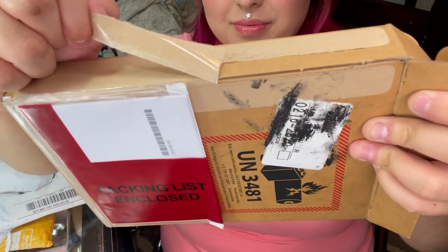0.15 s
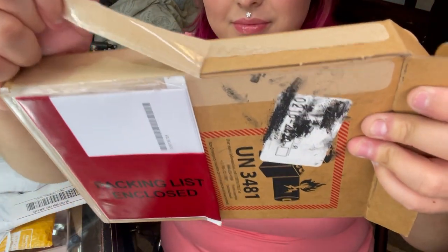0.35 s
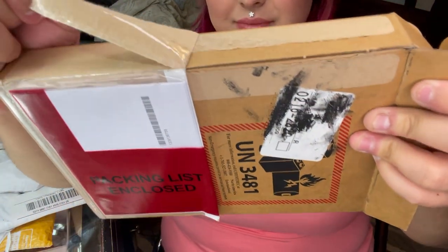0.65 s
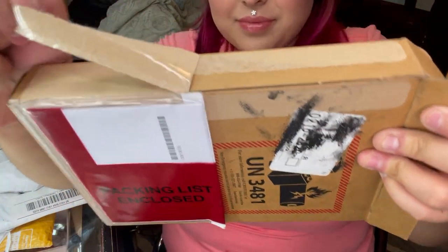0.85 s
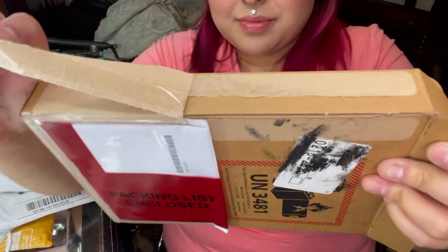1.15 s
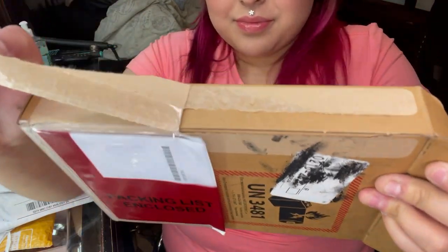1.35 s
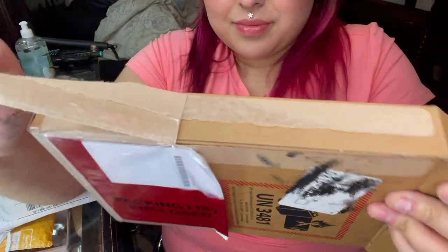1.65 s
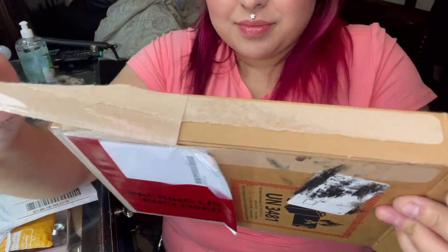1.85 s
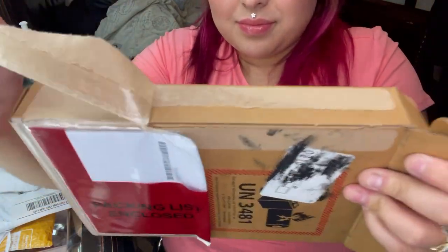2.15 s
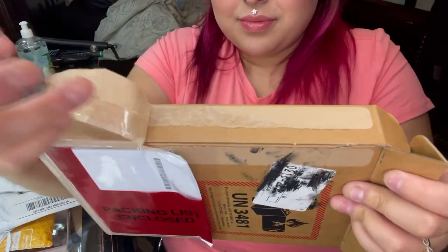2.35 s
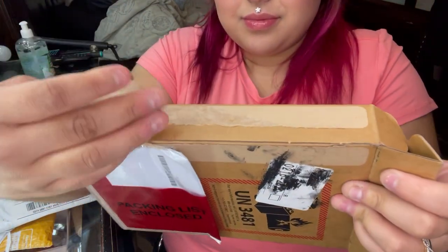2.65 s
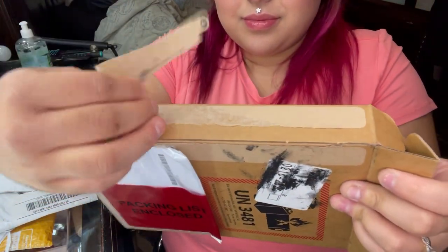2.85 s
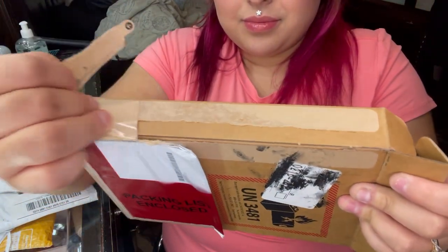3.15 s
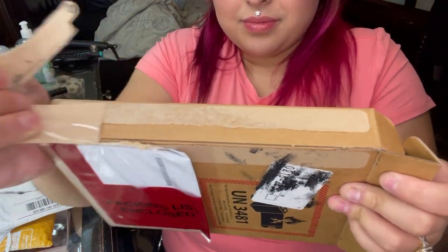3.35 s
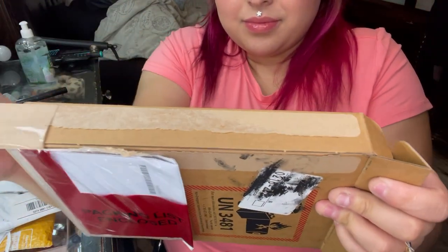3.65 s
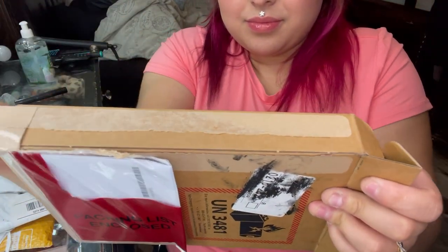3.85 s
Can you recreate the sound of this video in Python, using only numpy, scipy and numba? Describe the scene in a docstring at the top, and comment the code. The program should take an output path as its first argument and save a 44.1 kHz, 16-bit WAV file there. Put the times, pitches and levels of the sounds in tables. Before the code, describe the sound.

Packing tape peels off a cardboard box, close up in a small room. From 0 to 1.9 s a grainy fizz surges and slackens, with a hard tug near 0.87 s, a lull around 1.25 s and a low groan from 1.5 s. Sparse pops follow until 2.8 s. A louder, brighter pull crackles, rings and knocks, ending in a sharp clustered rip at 3.95 s over faint hum.

```python
"""The glue of packing tape fizzes as the strip is pulled off a cardboard box in two goes, close by in a small room.
The fizz is countless tiny random snaps; separate, coarser jerks drum on the box.
The flap groans and is shaken by one hard tug; taut tape rings; creases pop and knock on the box.
At the end the tape tears free in five sharp, overlapping bursts of noise that ring and thump.
Underneath lie a low hum of tones that slowly waver in level and a soft noise of air."""
import sys
import numpy as np
from scipy import signal
from scipy.fft import rfft, irfft, next_fast_len
from scipy.io import wavfile
from scipy.ndimage import uniform_filter1d, map_coordinates
from numba import njit

SR = 44100
rng = np.random.default_rng(int(sys.argv[2]) if len(sys.argv) > 2 else 0)


def master_out(mix):
    """Clip the mix to full scale and print it as 16-bit PCM to the path in sys.argv[1]."""
    frames = np.transpose(np.atleast_2d(mix))
    ceiling = np.clip(frames, -1, 1)
    pcm = np.round(ceiling * 32767).astype(np.int16)
    wavfile.write(sys.argv[1], SR, pcm)


N = 176400


def undb(db):
    """Turn decibels into a gain."""
    return 10 ** (np.asarray(db) / 20)


def unit(x):
    """Scale to an average strength (rms) of 1."""
    return x / np.sqrt(np.mean(x ** 2) + 1e-20)


def clock():
    """Time of each sample in seconds."""
    return np.arange(N) / SR


def curve(table, index=1):
    """One column of a table, joined by straight lines in time."""
    rows = np.array(table, float)
    return np.interp(clock(), rows[:, 0], rows[:, index])


def over_hz(points, size):
    """Points joined on a log-frequency axis, read at the bins of a transform."""
    rows = np.array(points, float)
    bin_hz = np.arange(size // 2 + 1) * SR / size
    return np.interp(np.log(bin_hz + 1), np.log(rows[:, 0]), rows[:, 1])


def colour(x, points):
    """Filter to a given spectrum without sounding early, keeping the power of white noise."""
    size = 4096
    cepstrum = irfft(np.log(unit(undb(over_hz(points, size)))))
    # folding the second half onto the first puts the filter's energy as early as possible
    cepstrum[1:size // 2] *= 2
    cepstrum[size // 2 + 1:] = 0
    response = irfft(np.exp(rfft(cepstrum)))
    return signal.fftconvolve(x, response)[:len(x)]


@njit
def resonate(x, hz, width):
    """Let through a band whose centre may move, as a resonance does."""
    y, band, low = np.empty(len(x)), 0., 0.
    for i in range(len(x)):
        g = np.tan(np.pi * hz[i] / SR)
        damping = width / hz[i]
        v = (band + g * (x[i] + 1e-18 - low)) / (1 + g * (g + damping))
        band = 2 * v - band
        low = low + 2 * g * v
        y[i] = damping * v
    return y


def ringing(x, hz, width):
    """Two equal resonances in a row make a steeper one, brought to rms 1."""
    once = resonate(x, hz, 1. * width)
    return unit(resonate(once, hz, 1. * width))


def walk(rate):
    """Smooth random wander with rms 1, through the given number of random points per second."""
    knots = rng.standard_normal(8192)
    return unit(map_coordinates(knots, [clock() * rate], order=3, mode="wrap"))


def snaps(rate, spread_db, judder_db):
    """Dense tiny snaps of uneven size, bunched as the tape sticks and slips."""
    judder_points_per_s = 148.4
    size = undb(spread_db * np.minimum(rng.exponential(size=N), 5))
    hit = rng.random(N) < rate / SR
    sign = np.sign(rng.standard_normal(N))
    return unit(hit * size * sign * undb(judder_db * walk(judder_points_per_s)))


def patchy(x):
    """The colour shifts between patches of glue: each band swells and fades alone."""
    depth_db, patches_per_s = 0.47, 22
    octave = np.log2(np.arange(N // 2 + 1) * SR / N + 1)
    spectrum, out = rfft(x), 0
    centres = np.arange(7, 14.1, .5)  # half-octave steps, as powers of two in Hz
    for weights in np.eye(len(centres)):
        band = irfft(spectrum * np.interp(octave, centres, weights), N)
        out = out + band * undb(depth_db * walk(patches_per_s))
    return unit(out) * np.std(x)


def ports(x, lag_ms):
    """Direct sound at two microphone ports: a positive lag delays the left, a negative one the right."""
    lag = int(round(lag_ms * SR / 1000))
    return np.array([np.pad(x, (max(late, 0), 0))[:len(x)] for late in (lag, -lag)])


def microphone(x, lag_s):
    """Direct sound reaches the left port late; the swaying box, body and walls scatter the rest."""
    # Each row: frequency in Hz, share of the sound's power that arrives by reflection (0 to 1).
    scatter = [(150, 0.057), (500, 0.33), (1200, 0.66), (5000, 0.9), (7300, 0.35), (8500, 0.0034),
               (10300, 0.017), (12000, 0.071), (15000, 0.031)]
    early_t60_s, room_t60_s, room_db = 0.017, 0.17, -7.5  # time to fade by 60 dB; room against early
    balance_db, sway_per_s = -1, 16  # left against right; random points per second
    size, t = next_fast_len(N + SR // 2), np.arange(SR // 3) / SR
    share = np.clip(over_hz(scatter, size), 0, 1)
    hz, spectrum, out = np.arange(size // 2 + 1) * SR / size, rfft(x, size), []
    for lag, side in ((lag_s, 1), (0, -1)):
        delay = np.exp(-2j * np.pi * hz * lag)
        heard = irfft(spectrum * np.sqrt(1 - share) * delay, size)[:N]
        # three sets of echoes trade places while their total power stays even
        sway = np.array([walk(sway_per_s) for _ in range(3)])
        for weight in sway / np.linalg.norm(sway, axis=0):
            early, late = (unit(rng.standard_normal(len(t)) * np.exp(-np.log(1000) * t / t60))
                           for t60 in (early_t60_s, room_t60_s))
            echoes = rfft(early + undb(room_db) * late, size)
            echoes = echoes / np.sqrt(uniform_filter1d(np.abs(echoes) ** 2, size=900))  # even in colour
            heard = heard + weight * irfft(spectrum * np.sqrt(share) * echoes, size)[:N]
        out.append(heard * undb(side * balance_db / 2))
    return np.array(out)


def peeling():
    """Glue threads snap; on the second pull the shorter, creased tape crinkles and rings too."""
    # Fizz of the parting glue. Each row: time in seconds, level in dB before the lift peel_db.
    peel = [(0, -57.5), (.03, -52.5), (.08, -57.5), (.105, -47), (.19, -48.5), (.235, -49), (.265, -43.5),
            (.31, -39.5), (.345, -46), (.41, -45.5), (.482, -47.5), (.52, -53), (.605, -43.5), (.665, -63),
            (.70, -51.5), (.742, -46), (.79, -52), (.84, -44), (.895, -41), (.94, -60.5), (1.03, -56),
            (1.118, -61), (1.156, -51), (1.2, -52), (1.235, -71), (1.32, -71), (1.345, -57), (1.498, -47),
            (1.574, -56), (1.63, -46.5), (1.786, -48.5), (1.846, -54.5), (1.868, -45.5), (1.9, -52.5),
            (1.95, -83)]
    # The tape is gripped again and pulled a second time. Each row: time in seconds,
    # level of the treble in dB before hiss_db, level of the crinkly middle in dB before crinkle_db.
    second_pull = [(1.95, -75, -75), (2.16, -70, -70), (2.23, -54.5, -65), (2.27, -75.5, -88),
                   (2.45, -71, -87), (2.475, -59.5, -79), (2.52, -77, -66), (2.56, -57, -55),
                   (2.62, -74.5, -70), (2.8, -58.5, -58), (2.86, -49, -56.5), (2.9, -46, -52),
                   (3.03, -55.5, -64), (3.08, -43, -44.5), (3.16, -47.5, -54), (3.28, -42, -52),
                   (3.325, -39, -47), (3.38, -46, -50.5), (3.44, -45, -46.5), (3.51, -42.5, -50.5),
                   (3.57, -46, -55), (3.66, -43.5, -54), (3.77, -51.5, -56), (3.83, -43.5, -51.5),
                   (3.89, -49, -56), (3.94, -42.5, -41.5), (4.0, -50, -49)]
    # Ring of the taut free length of tape. Each row: time in seconds, pitch in Hz before
    # a slight wobble, level of the lower of two rings in dB.
    tape_ring = [(2.82, 2700, -89), (2.89, 2560, -49.5), (2.96, 2280, -45), (3.03, 1900, -56),
                 (3.38, 2400, -66), (3.47, 2720, -51), (3.54, 3000, -44), (3.66, 2880, -51),
                 (3.8, 2860, -63), (4.0, 2500, -63)]
    # Colours of the glue, the hiss and the crinkle. Each row: frequency in Hz, relative level in dB.
    glue = [(500, -5.5), (1500, -3), (3200, -2.5), (4400, 1), (5400, -1.5), (6500, 1), (8500, -2),
            (11000, -1), (13000, -10), (15500, -21)]
    tape_hiss = [(1500, -7), (3000, -5), (4200, -4.5), (6000, -0.5), (7700, 0), (10500, -0.5), (13000, -10),
                 (15500, -33)]
    crinkle_colour = [(500, -36), (1100, -8.5), (1800, -5.5), (3000, -6.5), (4200, -11), (8000, -36)]
    peel_db, hiss_db, crinkle_db = 3.5, 2.5, 5
    ring_width_hz, upper_ring_ratio, upper_ring_db = 670, 1.48, -16  # width of each resonance

    first_snaps = snaps(rate=4500, spread_db=3, judder_db=1.5)
    first = colour(first_snaps * undb(curve(peel) + peel_db), glue)
    threads = snaps(rate=4500, spread_db=3.0, judder_db=1.0)
    hiss = colour(threads * undb(curve(second_pull) + hiss_db), tape_hiss)
    creases = snaps(rate=1300, spread_db=1.5, judder_db=2.5)
    crinkle = colour(creases * undb(curve(second_pull, index=2) + crinkle_db), crinkle_colour)

    ring_hz = curve(tape_ring) * (1 + 0.012 * walk(30))
    lower = ringing(threads, ring_hz, ring_width_hz)
    upper = ringing(threads, upper_ring_ratio * ring_hz, ring_width_hz)
    ring = (lower + undb(upper_ring_db) * upper) * undb(curve(tape_ring, index=2))
    return patchy(first + hiss + crinkle) + ring


def box_wall():
    """Coarser jerks of the tape drum on the cardboard and make the flap groan; one hard tug shakes it all."""
    # Drumming under the pull. Each row: time in seconds, level in dB before box_db.
    box = [(0, -54.5), (.22, -56.5), (.3, -45.5), (.35, -54.5), (.52, -56), (.6, -50), (.68, -77),
           (.75, -59), (.85, -53), (.95, -65), (1.4, -76), (1.48, -51.5), (1.57, -66), (1.66, -50),
           (1.88, -61), (1.95, -58), (2.75, -61.5), (3.03, -52), (3.11, -42.5), (3.17, -50), (3.28, -52.5),
           (3.34, -41), (3.44, -56), (3.51, -47), (3.58, -54.5), (3.7, -47.5), (3.77, -51), (3.92, -43.5),
           (4.0, -49)]
    # Low groan of the flexing flap. Each row: time in seconds, pitch in Hz, level in dB.
    groan_path = [(1.4, 403, -86), (1.49, 436, -47.5), (1.57, 413, -64), (1.67, 340, -56), (1.76, 396, -54),
                  (1.815, 443, -48), (1.89, 406, -51), (1.95, 400, -77)]
    # A hard tug pulls fibres off the cardboard. Each row: time in seconds, level in dB.
    tug_path = [(.8, -85), (.84, -43), (.868, -37.5), (.902, -42.5), (.925, -50), (.96, -82)]
    # Colours of the wall and of the tug. Each row: frequency in Hz, relative level in dB.
    wall = [(80, -51), (170, -3), (280, 5), (450, 7.5), (750, 5), (1150, 2), (1700, -16), (4000, -31.5)]
    tug_body = [(120, -22), (200, -2), (270, 2), (420, -5.5), (720, 3.5), (1050, -15), (2400, -15),
                (4000, -37)]
    box_db, groan_width_hz = -1, 150  # width of each resonance

    jerks = snaps(rate=2600, spread_db=2.0, judder_db=1.5)
    drumming = colour(jerks * undb(curve(box) + box_db), wall)
    groan = ringing(rng.standard_normal(N), curve(groan_path), groan_width_hz)
    groan = groan * undb(curve(groan_path, index=2))
    fibres = snaps(rate=810, spread_db=3.5, judder_db=1.0)
    tug = colour(fibres * undb(curve(tug_path)), tug_body)
    return patchy(drumming) + groan + tug


def tone(hz):
    """A steady sine of rms 1 that starts at a random point of its swing."""
    return np.sqrt(2) * np.sin(2 * np.pi * (hz * clock() + rng.random()))


def room(left_db=2):
    """A wavering hum and soft air noise; the lowest air noise is nearly alike on both sides."""
    # Low hum tones, each slowly wavering in level. Each row: frequency in Hz,
    # level in dB before the left-right balance, wander in dB.
    hum_rows = [(24.5, -76, 11), (97.94, -49.5, 0.3)]
    # Mains hum. Each row: time in seconds, level in dB before its wander and the balance.
    mains = [(0, -64), (.9, -53), (1.3, -45.5), (2.1, -49), (2.85, -48), (3.2, -56), (4, -90)]
    # Broad room tones. Each row: centre in Hz, width in Hz, level in dB before the balance.
    room_tones = [(234.7, 11.6, -60), (318.6, 9.1, -58)]
    # Colour of the air noise. Each row: frequency in Hz, relative level in dB.
    air = [(20, -2.5), (36, -27), (50, 1.5), (66, 3.5), (85, 1), (125, -8), (160, -3.5), (205, -12),
           (300, -6), (400, -15), (700, -18.5), (1200, -21.5), (2000, -28.5), (4000, -37), (8000, -60),
           (15000, -101)]
    # Left-right difference against the shared sound. Each row: frequency in Hz, level in dB.
    difference = [(70, -17.5), (160, -3), (350, -6.5), (700, 4), (3000, -4.0)]
    mains_hz, mains_wander_db, air_db = 60.05, 2, -47.5

    hum = sum(tone(hz) * undb(db + wander * walk(3.1)) for hz, db, wander in hum_rows)
    hum = hum + tone(mains_hz) * undb(curve(mains) + mains_wander_db * walk(5.55))
    for hz, width, db in room_tones:
        hum = hum + undb(db) * unit(resonate(rng.standard_normal(N), np.full(N, 1. * hz), 1. * width))

    shape = unit(undb(over_hz(air, N)))
    mid = irfft(rfft(rng.standard_normal(N)) * shape, N)
    side = irfft(rfft(rng.standard_normal(N)) * shape * undb(over_hz(difference, N)), N)
    sides = np.array([[1], [-1]])
    return (hum + undb(air_db) * (mid + sides * side)) * undb(sides * left_db / 2)


def splutter(decay):
    """A tenth of a second of fibre breaks that start at once and die away."""
    t = np.arange(SR // 10) / SR
    return np.sign(rng.standard_normal(len(t))) * np.exp(-t / decay)


def pop():
    """One clean break followed by a brief splutter of smaller ones."""
    x = undb(-19) * splutter(0.0012)
    x[0] = 1
    return x


def add(track, at, x):
    """Mix a short sound into a track at a time in seconds."""
    start = int(np.clip(at * SR, 0, N - 1))
    track[..., start:start + x.shape[-1]] += x[..., :N - start]


def crackles(crack_db=20.0, knock_db=3.5):
    """Creases pop at different places on the tape and knock on the box."""
    # Single crackles. Each row: start in seconds, level in dB before the lifts crack_db and knock_db,
    # knock in the box in dB against that level, pitch of the knock in Hz,
    # brightness in dB per octave, lag of the left port in ms.
    crackle_rows = [(0.264, -41, 1, 800, 14, -0.081), (1.7199, -43.5, 5, 800, -1.5, 0.036),
                    (1.8543, -37, 7, 870, 0, 0.19), (1.892, -44, 3.5, 1130, -5.5, .1),
                    (2.1065, -60, 22, 1070, 0, 0), (2.1815, -48.5, 0, 940, 5.5, 0.034),
                    (2.342, -42, 0, 800, 1, 0.076), (2.4554, -39, -1, 1430, -4.5, 0.025),
                    (2.8285, -44.5, -5, 1000, .5, -0.045), (2.8907, -38, -12, 1000, 1.5, -0.17),
                    (2.9676, -46.5, -11, 1000, 22, 0), (3.076, -29, -11, 800, 12.5, -0.14),
                    (3.0868, -39, -2, 700, 4, -0.065), (3.118, -39.5, 7.5, 1060, -3, 0.11),
                    (3.2122, -31, 0, 804, 2, 0.067), (3.331, -40.5, 1, 960, -4, .05),
                    (3.3601, -34, 5, 900, -1.5, 0.063), (3.4036, -35, -7, 745, -2.5, 0.0084),
                    (3.4802, -33, -9, 900, 1.5, -0.2), (3.5115, -37, -3, 850, -1, .05),
                    (3.5845, -30.5, -20, 900, -0.5, 0)]
    # Colour of a crackle before its brightness tilt. Each row: frequency in Hz, relative level in dB.
    crack = [(200, -15.5), (900, -1), (1900, 1), (3600, 2.5), (5500, -0.5), (8000, -6.5), (11000, -6.5),
             (15500, -31)]
    # Colour of a knock. Each row: frequency as a ratio to the knock's pitch, relative level in dB.
    knock_shape = [(.12, -35), (.4, -6.5), (.7, -3), (1, 4.5), (1.4, -5.5), (2.1, -10.5), (6, -43)]
    knock_decay_s = 0.002
    cracks, knocks = np.zeros((2, N)), np.zeros(N)
    for at, db, knock, knock_hz, tilt, lag_ms in crackle_rows:
        crack_colour = [(hz, level + tilt * np.log2(hz)) for hz, level in crack]
        sharp = ports(colour(pop(), crack_colour), lag_ms)
        add(cracks, at, undb(db + crack_db) * sharp)
        knock_colour = [(ratio * knock_hz, level) for ratio, level in knock_shape]
        dull = colour(splutter(knock_decay_s), knock_colour)
        add(knocks, at, undb(db + knock + knock_db) * dull)
    return cracks, knocks


def burst(at, attack, decay):
    """A rush of fibre breaks that swells to a moment and dies away."""
    t = clock() - at
    swell = np.exp(np.maximum(np.minimum(t / attack, -t / decay), -40))
    return np.sign(rng.standard_normal(N)) * swell


def last_rip():
    """The tape tears free in a few quick jerks that ring the strip and thump the box."""
    # The jerks. Each row: moment of the peak in seconds, peak level in dB before colouring,
    # knock in the box in dB against that level, attack in seconds, decay in seconds.
    rips = [(3.9471, -20, -2.5, 0.0022, 0.0039), (3.951, -21, -2, 0.00033, 0.00086),
            (3.9523, -21, -10, 0.00058, 0.0023), (3.9586, -19, -17, 0.00055, 0.0011),
            (3.961, -23.5, -0.5, 0.00064, 0.0039)]
    # What rings as the tape comes free. Each row: start in seconds, pitch in Hz,
    # starting level in dB, time to fade by 60 dB in seconds.
    rip_modes = [(3.9492, 529.2, -24, 0.016), (3.9581, 2780, -9, 0.022)]
    # Colours of the tear and the thump. Each row: frequency in Hz, relative level in dB.
    rip_tear = [(300, -8), (1500, -5), (2700, 8.5), (4200, -3), (6000, 0.5), (7800, -1.5), (10500, -3.5),
                (12500, -17), (15500, -28)]
    rip_thump = [(70, -10), (200, -2.5), (350, -7), (520, 8.5), (750, 2), (1100, -10), (2500, -22)]
    tear, thump, ring = np.zeros((3, N))
    for at, db, knock, attack, decay in rips:
        tear += undb(db) * burst(at, attack, decay)
        thump += undb(db + knock) * burst(at, attack, decay)
    for at, hz, db, t60 in rip_modes:
        t = np.maximum(clock() - at, 0)
        ring += undb(db) * np.sin(2 * np.pi * hz * t) * np.exp(-np.log(1000) * t / t60)
    return colour(tear, rip_tear), ring, colour(thump, rip_thump)


def scene():
    """Tape and box in front of the microphone, over the hum of the room."""
    tape_lag_s, box_lag_s, rip_lag_ms = 0.000168, .00009, -0.15
    bounce_s, bounce_db = 0.000893, -5
    cracks, knocks = crackles()
    tear, ring, thump = last_rip()
    # sharp sounds come straight to the ports, then again off the box
    direct = cracks + ports(tear + ring, rip_lag_ms)
    bounce = undb(bounce_db) * np.pad(cracks[1] + tear, (int(bounce_s * SR), 0))[:N]
    tape = microphone(peeling() + bounce, tape_lag_s)
    box = microphone(box_wall() + knocks + thump, box_lag_s)
    box = box * undb(np.array([[-1.2], [1.2]]))  # shifted towards the right
    return direct + tape + box + room()


def record(dry):
    """The recorder cuts the top: a steep filter removes what lies above 15800 Hz."""
    low_pass = signal.ellip(10, .2, 80, 15800, fs=SR, output="sos")
    return signal.sosfilt(low_pass, dry)


dry = scene()
out = record(dry)
master_out(out)
```